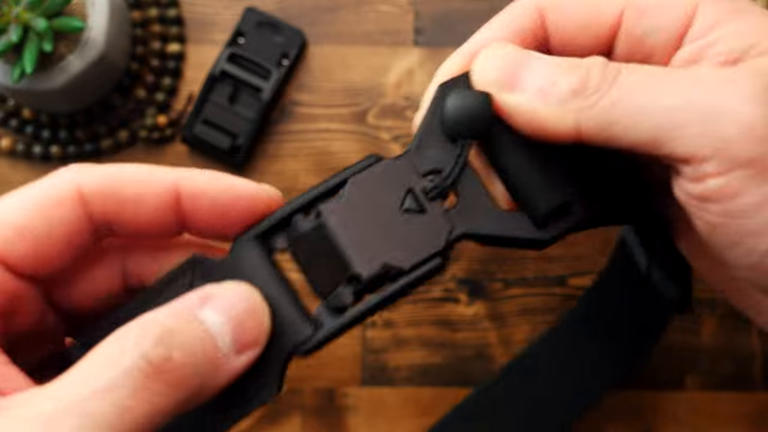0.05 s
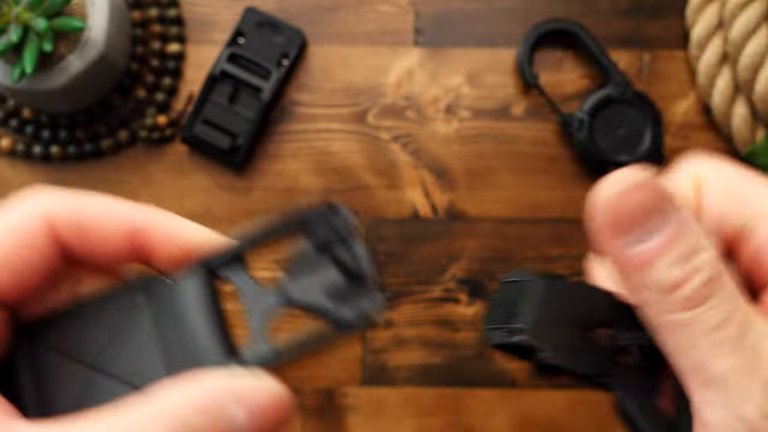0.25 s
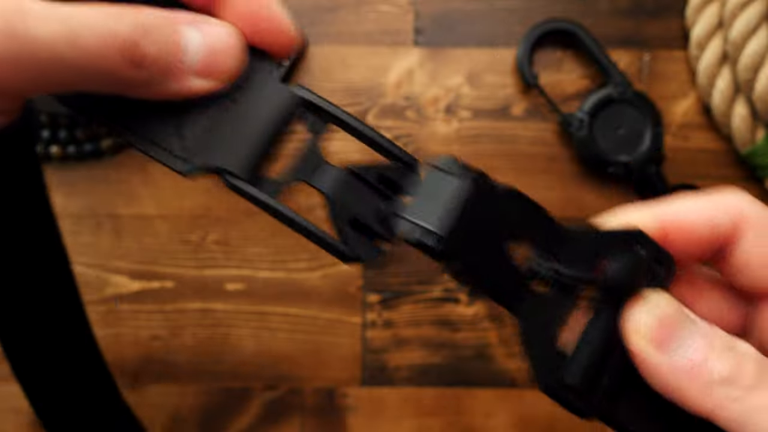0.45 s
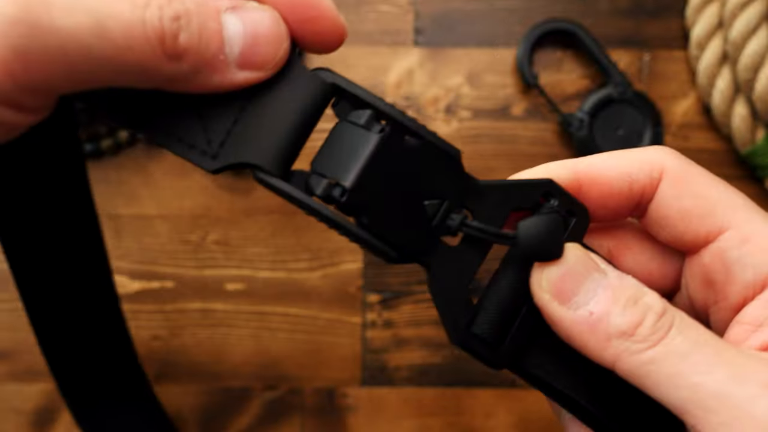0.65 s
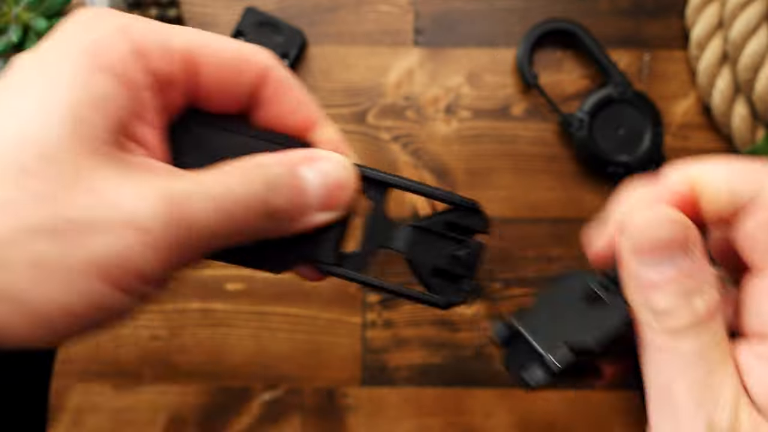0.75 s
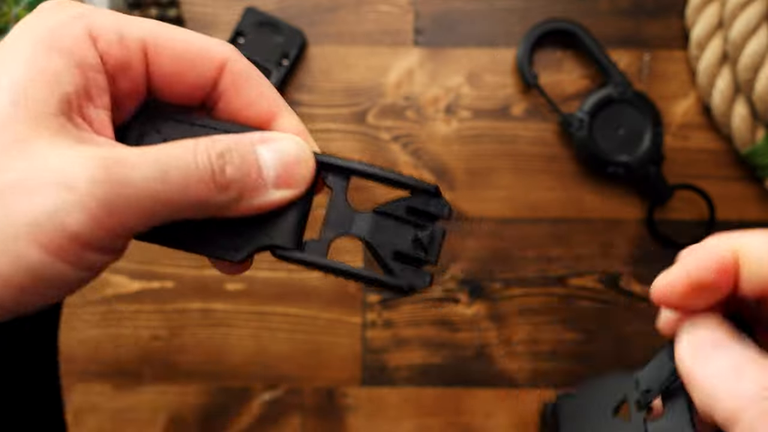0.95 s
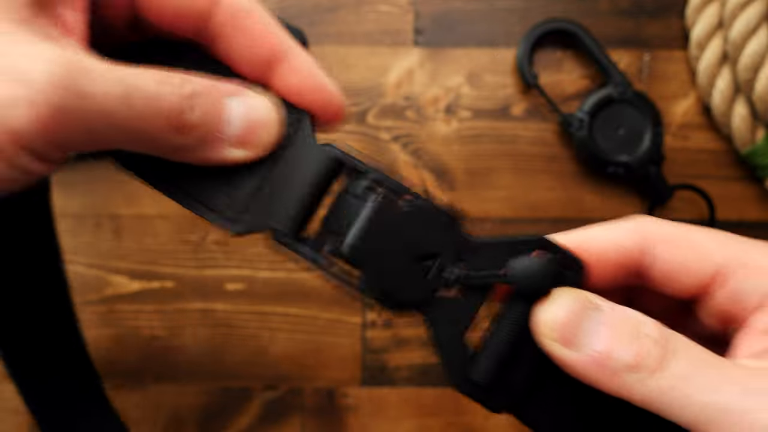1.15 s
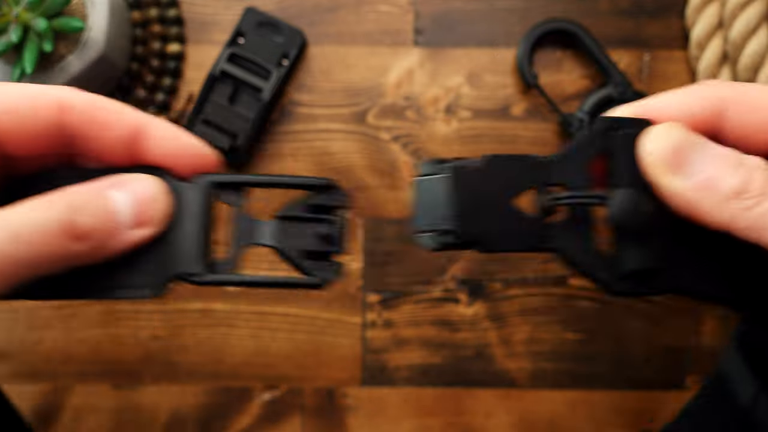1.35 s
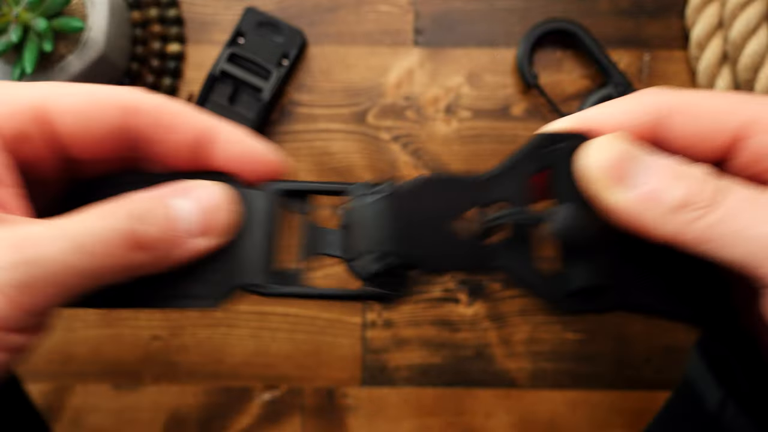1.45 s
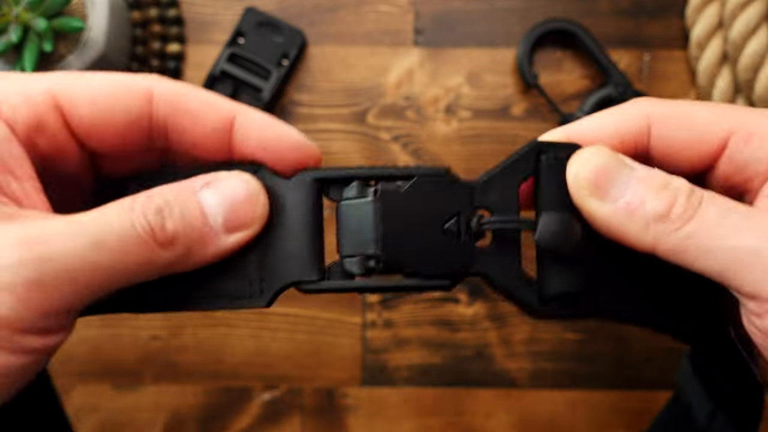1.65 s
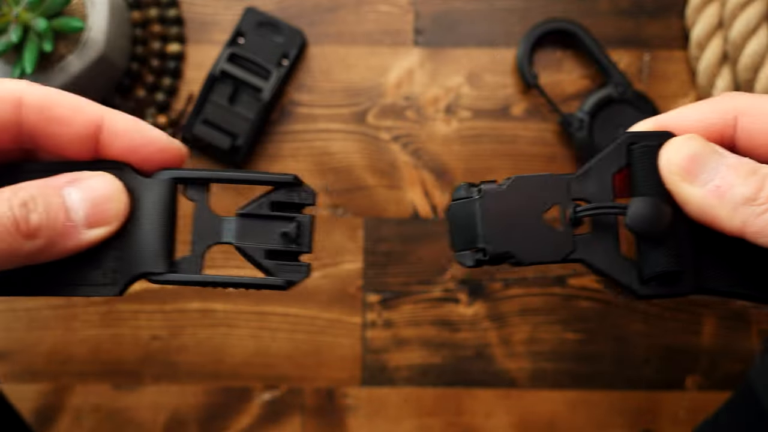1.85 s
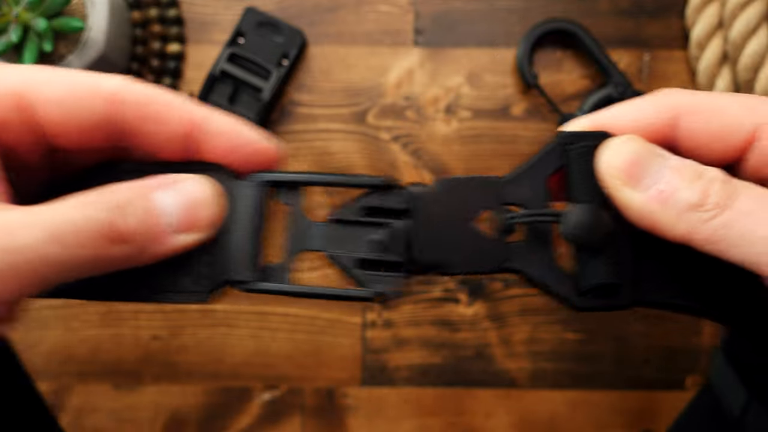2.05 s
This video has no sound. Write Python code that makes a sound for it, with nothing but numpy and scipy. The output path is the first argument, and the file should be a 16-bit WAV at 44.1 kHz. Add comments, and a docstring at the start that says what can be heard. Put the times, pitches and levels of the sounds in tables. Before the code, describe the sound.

A magnetic belt buckle snaps and clacks sharply, again and again, close up in a quiet room

```python
"""A magnetic belt buckle clatters close by in a small quiet room, over a steady low rumble and a hum that swells midway.
Hands pull it open and snap it shut: each contact is a short chatter of noise that rings the plastic frame,
the latch, the metal hook, the magnet plate and a hand thud, with a bright crack on top.
The room answers with quick near echoes and a tail; some tails stop short.
Strap rustle is coloured noise that swells and sinks; the hum is a wavering sine beside a narrow noise drone."""
import sys
import numpy as np
from scipy import signal
from scipy.fft import rfft, irfft
from scipy.io import wavfile

SR = 44100
rng = np.random.default_rng(int(sys.argv[2]) if len(sys.argv) > 2 else 0)


def log_audio(samples):
    """Write samples as a 16-bit WAV file to the path given in sys.argv[1]."""
    # one column per channel
    frames = np.atleast_2d(samples).T
    # limit to full scale, then quantise
    limited = np.clip(frames, -1, 1)
    pcm = np.round(limited * 32767).astype(np.int16)
    wavfile.write(sys.argv[1], SR, pcm)


N = 93271
LEFT_RIGHT_GAIN = np.array([[1.06], [.94]])  # rumble and hum sit slightly to the left
OPPOSITE = np.array([[1], [-1]])  # spreads a side signal in opposite polarity, left and right


def undb(db):
    """Turn dB into gain."""
    return 10 ** (np.asarray(db) / 20)


def unit(x):
    """Scale to rms 1."""
    return x / np.sqrt(np.mean(x ** 2))


def coloured(spectrum):
    """Shape white noise by a spectrum of f/Hz, level/dB points, then scale to rms 1."""
    hz, db = np.array(spectrum).T
    log_f = np.log(np.arange(N // 2 + 1) * SR / N + 1)
    gain = undb(np.interp(log_f, np.log(hz), db))
    return unit(irfft(rfft(rng.standard_normal(N)) * gain, N))


def curve(points):
    """Draw a gain envelope through t/s, level/dB points."""
    t, db = np.array(points).T
    return undb(np.interp(np.arange(N) / SR, t, db))


def slow_noise(cutoff_hz):
    """Low-passed noise of rms 1, for irregular modulation."""
    return unit(signal.lfilter(*signal.butter(1, cutoff_hz, fs=SR), rng.standard_normal(N)))


# Colour of the room rumble, relative: f/Hz, level/dB (per Hz)
RUMBLE_SPECTRUM = [(15, -45.5), (25, -34.5), (92, -3.5), (166, -4.5), (373, -11.5), (451, -11.5),
                   (575, -25), (714, -24), (887, -28.5), (1070, -28.5), (1290, -30), (1790, -42.5),
                   (7920, -67), (9840, -52.5), (16000, -68)]
RUMBLE_DB, RUMBLE_SIDE_DB = -62, -18  # centre level; side relative to centre


def rumble():
    """Steady room rumble: mostly shared low noise, with a faint independent side signal."""
    centre = coloured(RUMBLE_SPECTRUM) * LEFT_RIGHT_GAIN
    side = undb(RUMBLE_SIDE_DB) * coloured(RUMBLE_SPECTRUM) * OPPOSITE
    return undb(RUMBLE_DB) * (centre + side)


# Swell of the low hum: t/s, level/dB (rms)
HUM_LEVEL = [(0, -73.5), (1.05, -68), (1.13, -58), (1.375, -58.5), (1.39, -68.5), (2.11, -73.5)]
HUM_HZ, HUM_WAVER_HZ = 161.8, 1.8  # centre pitch and rms pitch wander


def hum():
    """A low sine whose pitch wanders irregularly as its level swells."""
    pitch = HUM_HZ + HUM_WAVER_HZ * slow_noise(6)
    phase = 2 * np.pi * np.cumsum(pitch) / SR
    return np.sqrt(2) * np.sin(phase) * curve(HUM_LEVEL) * LEFT_RIGHT_GAIN


DRONE_HZ, DRONE_WIDTH_HZ, DRONE_DB = 123, 3.3, -71.5


def drone():
    """A second low tone of the room: noise narrowed to a few hertz, at a fixed average level."""
    edges = [DRONE_HZ - DRONE_WIDTH_HZ / 2, DRONE_HZ + DRONE_WIDTH_HZ / 2]
    band = signal.lfilter(*signal.butter(1, edges, "band", fs=SR), rng.standard_normal(N))
    return unit(band) * undb(DRONE_DB) * LEFT_RIGHT_GAIN


# Colour of the rubbing webbing, relative: f/Hz, level/dB (per Hz)
RUSTLE_SPECTRUM = [(530, -41), (900, 2), (1130, -5.5), (1620, -6), (3190, -5.5), (5820, -10), (11400, -4.5),
                   (15100, -20), (16000, -20)]
# Strap movement, centre signal before the grain: t/s, level/dB
RUSTLE_LEVEL = [(0, -79.5), (.03, -59), (.18, -85.5), (.52, -81), (.55, -70), (.62, -62.5), (.75, -81.5),
                (1.11, -86), (1.13, -68.5), (1.17, -69), (1.25, -72.5), (1.38, -81), (1.75, -89.5),
                (1.77, -82), (1.87, -74), (2.08, -82.5), (2.11, -74)]
RUSTLE_GRAIN_DB, RUSTLE_GRAIN_HZ = 2.5, 60  # rms depth and cutoff of the unevenness


def rustle():
    """The strap rustles in the hands: wide noise roughened by the uneven rub of the webbing."""
    wide = coloured(RUSTLE_SPECTRUM) + .4 * coloured(RUSTLE_SPECTRUM) * OPPOSITE
    grain = undb(RUSTLE_GRAIN_DB * slow_noise(RUSTLE_GRAIN_HZ))
    return wide * curve(RUSTLE_LEVEL) * grain


CLUMP_DB, CLUMP_MS = 4, 0.37  # rms depth and time constant of the unevenness
RISE_MS = 0.53


def chatter(length_ms, size=1400):
    """A clumpy burst of tiny hard impacts that holds, then dies; nearly even spectrum, energy 1."""
    t_ms = 1e3 * np.arange(size) / SR
    smoothing = np.exp(-1e3 / SR / CLUMP_MS)
    clumps = signal.lfilter([1], [1, -smoothing], rng.standard_normal(size))
    fall_db = -11 * (t_ms / length_ms) ** 4.3
    shape = undb(CLUMP_DB * unit(clumps) + fall_db) * np.minimum(t_ms / RISE_MS, 1)
    burst = rng.standard_normal(size) * shape
    # Flatten the spectrum and restore the envelope in turn
    for _ in range(3):
        tones = rfft(burst)
        even = signal.hilbert(irfft(tones / np.abs(tones), size))
        burst = shape * np.real(even / np.abs(even))
    return burst / np.sqrt(np.sum(burst ** 2))


# The grip changes every mode a little: standard deviations in dB and as a share of the pitch
GRIP_DB, GRIP_DETUNE = 3.36, 0.0086


def ring(modes, size=2600):
    """Sum decaying sine modes into an impulse response, a little different for every grip."""
    t = np.arange(size) / SR
    grip = rng.standard_normal((len(modes), 2))
    body = np.zeros(size)
    for (hz, db, decay_ms), (louder, sharper) in zip(modes, grip):
        envelope = undb(db + GRIP_DB * louder - 49 * 1e3 * t / decay_ms)
        body += envelope * np.sin(2 * np.pi * hz * (1 + GRIP_DETUNE * sharper) * t)
    return body


# Nominal modes of the plastic frame, latch, metal hook, magnet plate and hand thud:
# f/Hz, level/dB (relative), decay/ms (time to fall 49 dB)
FRAME_MODES = [(2344, -3.5, 5.5), (2780, -3.5, 2.6), (3696, 10, 3.84), (4274, -0.5, 8.8)]
LATCH_MODES = [(1372, -16, 10), (1832, -7.5, 7.2), (5292, -1, 11), (5185, 7, 2.2), (6330, -3.5, 10)]
HOOK_MODES = [(7500, -10, 9.8), (8180, -5.5, 9.1), (8754, 1, 15), (9620, 5, 4.9)]
PLATE_MODES = [(9850, -4.5, 4), (10430, 9.5, 10), (10780, 5, 10), (11330, -6, 4.9), (11520, -3.5, 4.8),
               (13260, -12, 1.4)]
THUD_MODES = [(378, 2.5, 15), (468, 4.5, 24), (610, -4, 21)]
# Low cut per part in that order, keeping bass out of the ringing: f/Hz
PART_LOW_CUT = [1700, 1100, 5000, 6000, 280]
# Difference of each part at the two microphone ports, relative to its centre: level/dB
PART_SIDE = [-6.5, -3, -8, -18, -16]
# Share of each part's centre added to the side, louder on the left: share
PART_LEAN = [0.033, 0.09, 0.027, 0.033, 0.34]
CRACK_DB, CRACK_HZ = -10.5, 5800  # gain against the hook level, before the low cut


def contact(length_ms, *parts_db):
    """One contact: chatter rings every part at its own strength under a crack; left and right."""
    centre, side = np.zeros((2, 3999))
    side_push = chatter(length_ms)
    parts = (FRAME_MODES, LATCH_MODES, HOOK_MODES, PLATE_MODES, THUD_MODES)
    for modes, db, low_hz, side_db, lean in zip(parts, parts_db, PART_LOW_CUT, PART_SIDE, PART_LEAN):
        push = chatter(length_ms)
        body = signal.sosfilt(signal.butter(5, low_hz, "high", fs=SR, output="sos"), ring(modes))

        def rung(burst, level_db):
            sound = signal.fftconvolve(burst, body)
            return undb(level_db) * sound * 20 / np.sqrt(np.sum(sound ** 2))

        part = rung(push, db)
        centre += part
        side += lean * part + rung(side_push, db + side_db)
    # The crack shares the thud's chatter
    crack = signal.lfilter(*signal.butter(4, CRACK_HZ, "high", fs=SR), push)
    centre[:len(crack)] += 20 * undb(parts_db[2] + CRACK_DB) * crack
    return np.array([centre + side, centre - side])


# Decay to -60 dB below 6 kHz, from 6 to 12 kHz and above
ROOM_T60_S, ROOM_TREBLE_T60_S, ROOM_TOP_T60_S = 0.41, 0.26, 0.22
NEAR_T60_S = .04  # table top and hands nearby
ROOM_DB, NEAR_DB = -11, -7.5  # energy against the direct sound, before onset and low cut
ROOM_ALIKE, ROOM_LOW_HZ = 0.31, 970  # left-right likeness; low cut of the echoes


def room(size=18000):
    """Stereo response: direct sound, quick nearby echoes, then a tail that is shorter in the treble."""
    t = np.arange(size) / SR
    mid, side = rng.standard_normal((2, size))
    noise = np.sqrt(1 + ROOM_ALIKE) * mid + np.sqrt(1 - ROOM_ALIKE) * side * OPPOSITE
    low = signal.sosfiltfilt(signal.butter(2, 6000, fs=SR, output="sos"), noise)
    below_top = signal.sosfiltfilt(signal.butter(2, 12000, fs=SR, output="sos"), noise)
    tail = low * undb(-60 * t / ROOM_T60_S)
    tail += (below_top - low) * undb(-60 * t / ROOM_TREBLE_T60_S)
    tail += (noise - below_top) * undb(-60 * t / ROOM_TOP_T60_S)
    tail = undb(ROOM_DB) * tail / np.sqrt(np.sum(tail ** 2) / 2)
    near = noise * undb(-60 * t / NEAR_T60_S)
    near = undb(NEAR_DB) * near / np.sqrt(np.sum(near ** 2) / 2)
    echoes = (tail + near) * np.minimum(t / 0.006, 1)  # 6 ms onset
    response = signal.lfilter(*signal.butter(2, ROOM_LOW_HZ, "high", fs=SR), echoes)
    response[:, 0] = 1  # direct sound
    return response


# Buckle contacts: t/s, chatter length/ms, frame level/dB, latch level/dB, hook level/dB,
# magnet plate level/dB, hand thud level/dB, balance/dB (left minus right, on top of the lean)
CONTACT_TABLE = [(0.0336, 5.7, -30.5, -43, -25, -49, -60.5, 0.5),
                 (0.0357, 4.57, -40, -47, -30.5, -32, -57.5, -0.5),
                 (0.051, 5.1, -44, -60.5, -36.5, -42.5, -59, -5),
                 (0.3192, 7.3, -55.5, -52, -46.5, -43.5, -62.5, 1),
                 (0.3223, 15.6, -43, -38, -28.5, -31, -62.5, 0.5),
                 (0.3411, 9.7, -47.5, -33.5, -30, -26.5, -54, -1),
                 (0.3451, 3.3, -40, -65, -30.5, -14.5, -49.5, 0.5),
                 (.35, 2.5, -44.5, -56, -45.5, -27, -60, 0.5),
                 (0.3539, 1.98, -37.5, -44.5, -31, -35.5, -64, 1),
                 (0.571, 3.5, -74, -84, -78.5, -82, -70, 0.5),
                 (0.634, 1.11, -31.5, -46.5, -34, -27, -59, -1),
                 (0.6352, 3.63, -41, -36, -24, -30, -62.5, 2),
                 (0.665, 3.2, -53, -65.5, -59, -67, -52.5, -1),
                 (0.912, 6.4, -52, -48, -40, -36, -63.5, 5.5),
                 (0.9205, 2.14, -49.5, -42.5, -41.5, -34.5, -65, -4.5),
                 (0.9286, 5.9, -42.5, -60, -38.5, -28.5, -56, 2.5),
                 (0.9343, 2.7, -51.5, -36.5, -21.5, -21, -53.5, 2),
                 (0.938, 4.1, -37.5, -51.5, -50, -18.5, -52.5, 0.5),
                 (.946, 7.1, -44, -46, -33, -36.5, -73.5, -8.5),
                 (1.1741, 1.7, -60.5, -83.5, -85.5, -83.5, -64.5, -3),
                 (1.2691, 3.68, -36.5, -49, -22.5, -27, -56, 0.5),
                 (1.2729, 3.9, -45.5, -52.5, -39.5, -42.5, -67.5, 2.5),
                 (1.503, 9, -55.5, -55.5, -54.5, -45.5, -65, 0),
                 (1.5057, 7.2, -49.5, -45, -47, -40, -70, 2.5),
                 (1.536, 10.5, -47, -48, -39, -42.5, -53, 0.5), (1.5463, 5, -38, -51, -21, -17, -49, -1),
                 (1.5588, 8.1, -42, -42, -33.5, -39, -68.5, -2),
                 (1.884, 3.9, -46, -38, -37.5, -24.5, -60.5, -1),
                 (1.8885, 3.7, -47, -37, -45, -27.5, -61, 6), (1.896, 4.3, -49, -37, -23.5, -21.5, -52, 1),
                 (1.8991, 3.9, -38, -52, -25.5, -22.5, -57, -3.5),
                 (1.9023, 4.4, -47, -49, -41, -46, -64, 2),
                 (1.9368, 4.94, -35.5, -43.5, -34.5, -30.5, -67, 1.5)]
# Moments where the ringing stops short: t/s
TAIL_STOPS = [0.184, 0.532, 0.75, 1.116, 1.385, 1.751, 2.087]
STOP_FADE_MS = 13


def buckle():
    """Contacts ring in the room, with fresh echoes after each stop, until the next stop fades them out."""
    out = np.zeros((2, N))
    sounds = []
    for s, length_ms, *parts_db, balance_db in CONTACT_TABLE:
        balance = undb(balance_db / 2 * OPPOSITE)
        sounds.append((s, contact(length_ms, *parts_db) * balance))
    for start, end in zip([0] + TAIL_STOPS, TAIL_STOPS):
        first, last = int(start * SR), int(end * SR)
        length = last - first
        clatter = np.zeros((2, length + 4000))
        for s, sound in sounds:
            if start <= s < end:
                at = int(s * SR) - first
                clatter[:, at:at + sound.shape[1]] += sound
        fade = np.clip(np.arange(length)[::-1] * 1e3 / SR / STOP_FADE_MS, 0, 1)
        out[:, first:last] = signal.fftconvolve(clatter, room(), axes=1)[:, :length] * fade
    return out


def scene():
    """Layer rumble, hum, drone and strap rustle under the buckle."""
    return rumble() + hum() + drone() + rustle() + buckle()


HEADROOM, TOP_HZ = 1.1, 15900  # saturation ceiling (full scale = 1); treble limit


def record(dry):
    """Soft saturation rounds the loudest peaks, then a steep low-pass cuts the top."""
    rounded = HEADROOM * np.tanh(dry / HEADROOM)
    return signal.sosfilt(signal.ellip(10, .2, 70, TOP_HZ, fs=SR, output="sos"), rounded)


dry = scene()
out = record(dry)
log_audio(out)
```